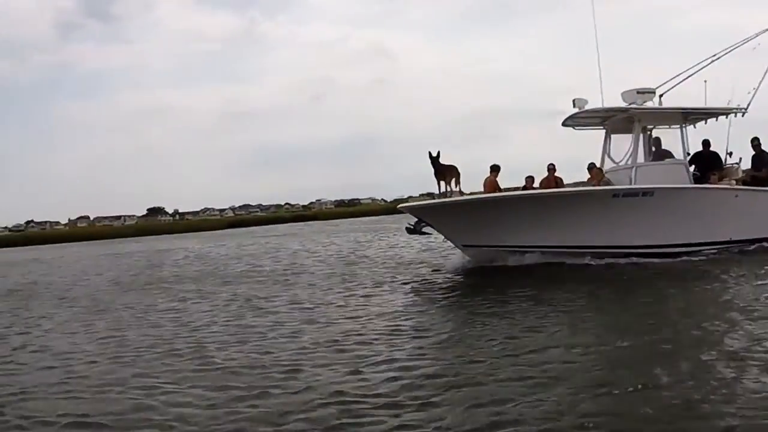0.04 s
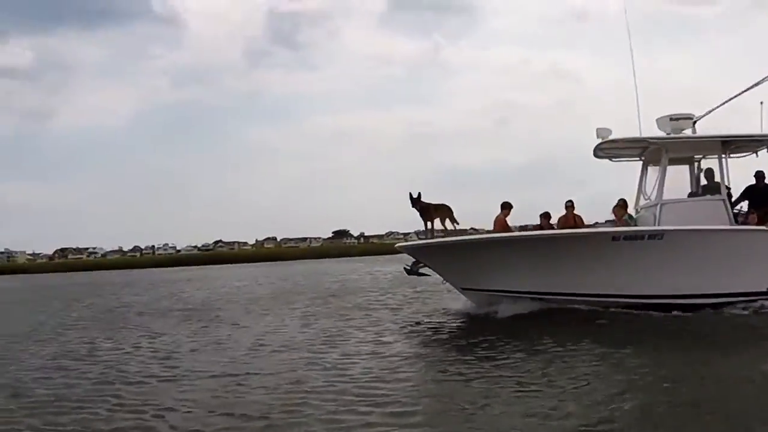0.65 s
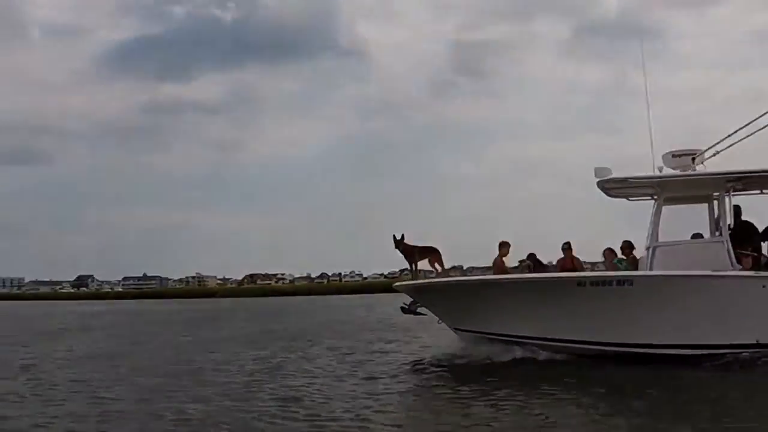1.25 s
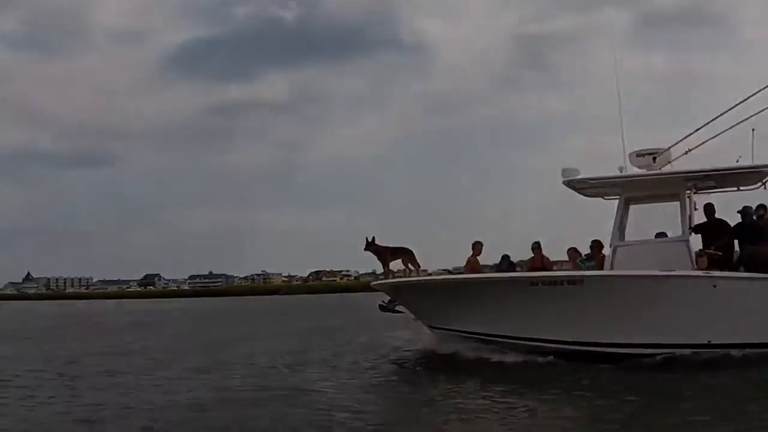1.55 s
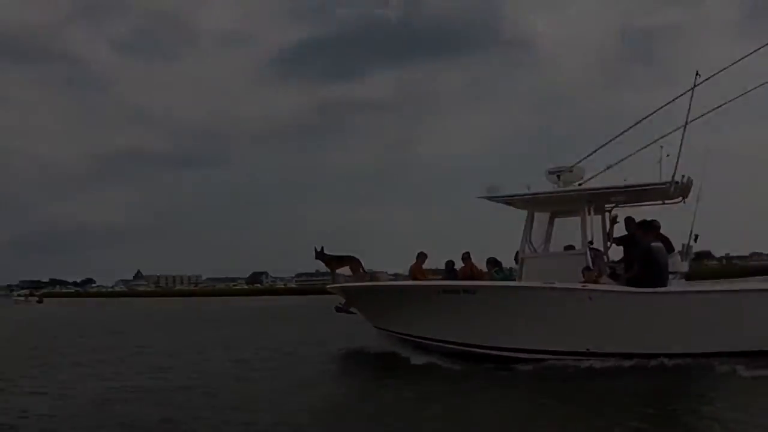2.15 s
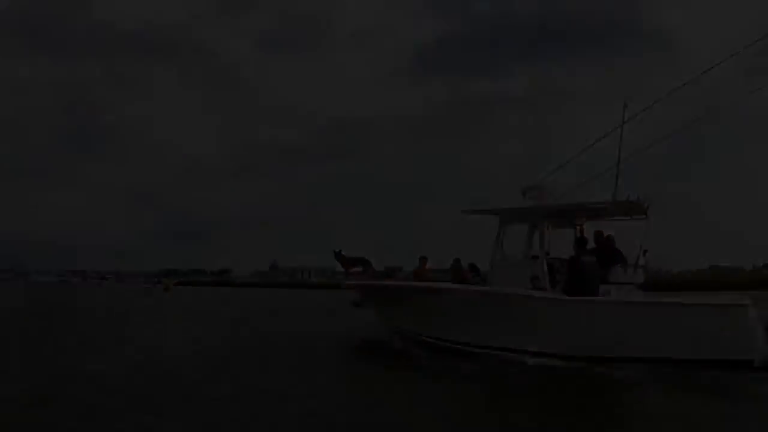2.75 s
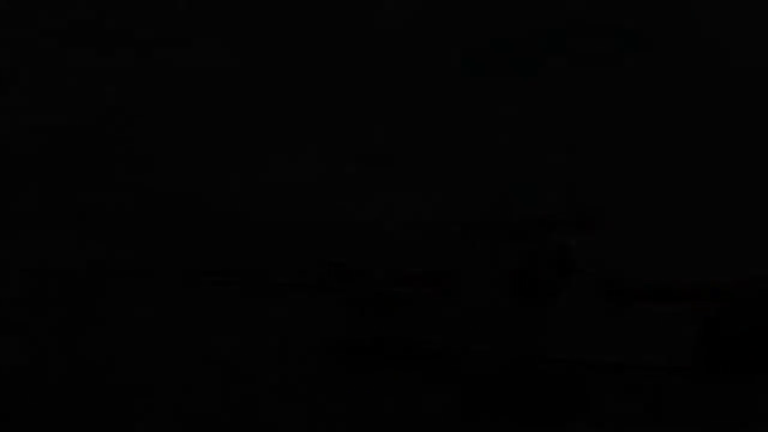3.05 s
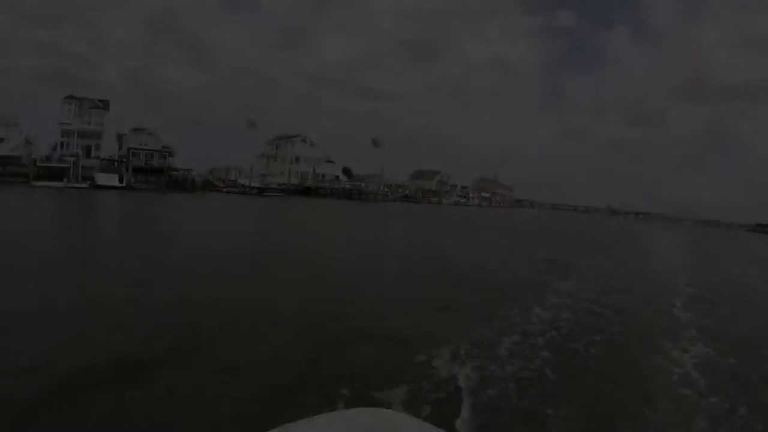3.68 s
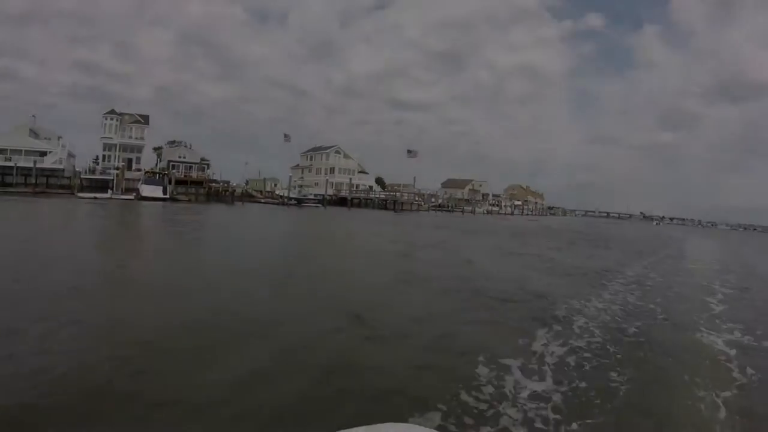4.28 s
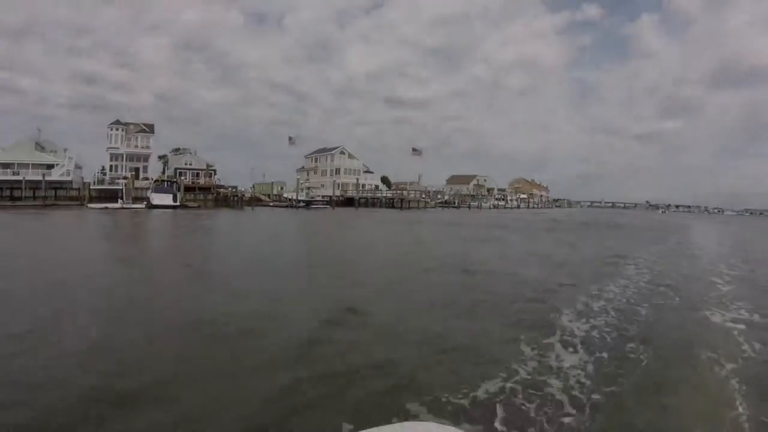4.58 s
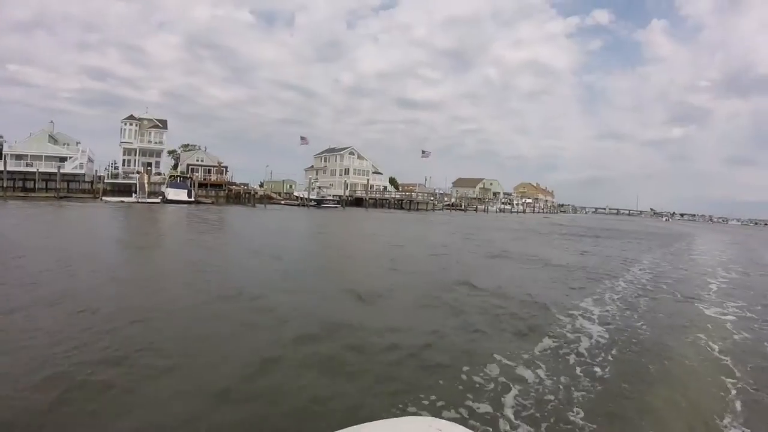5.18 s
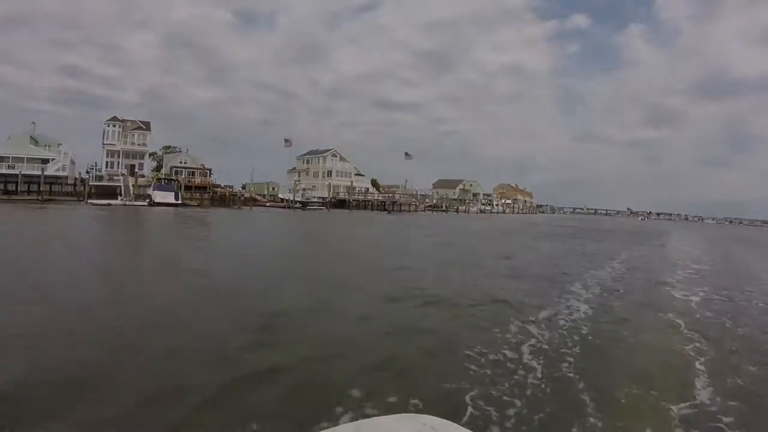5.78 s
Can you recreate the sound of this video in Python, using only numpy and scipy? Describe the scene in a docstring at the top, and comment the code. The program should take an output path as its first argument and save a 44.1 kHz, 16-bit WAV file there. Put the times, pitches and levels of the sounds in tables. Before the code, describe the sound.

A motorboat's outboard hums at cruise under gusty wind and wake hiss, then abruptly switches to a slow, knocking run with one sharp click.

```python
"""On board a motorboat with a four-stroke outboard: wind buffets the microphone, the wake hisses behind.
The engine first cruises, a firing hum over a mechanical roar. After a sudden change of scene it runs
slowly and keeps easing off: uneven knocks ring its cowl, and the shaft rasps and ticks on every turn.
Something flicks the microphone once."""
import sys
import numpy as np
from scipy import signal
from scipy.fft import rfft, irfft, next_fast_len
from scipy.io import wavfile
from scipy.ndimage import uniform_filter1d

SR = 44100
rng = np.random.default_rng(int(sys.argv[2]) if len(sys.argv) > 2 else 0)


def wav_out(sig):
    """Save sig, one row per channel (or a flat mono array), as 16-bit PCM at SR to the path in sys.argv[1]."""
    wavfile.write(sys.argv[1], SR, np.round(np.clip(np.atleast_2d(sig).T, -1, 1) * 32767).astype(np.int16))


N = 265746
TIME = np.arange(N) / SR
CHANGE_S, FLICK_S = 3.155, 3.8228
CRUISE_HZ, SLOW_HZ = 43.5, 26.45  # engine cycle rates; one cycle = two shaft turns
LOST_HZ = 0.48 * np.maximum(TIME - CHANGE_S, 0) ** 1.65  # the slow run eases off ever faster
SPEED_HZ = SLOW_HZ - LOST_HZ


def gain_of(db):
    """Decibels to gain."""
    return np.exp(np.asarray(db) * np.log(10) / 20)


def unit_rms(x):
    """Scales to rms 1."""
    return x / np.sqrt(np.mean(x ** 2) + 1e-20)


def swell(x, centre, half_width):
    """Gaussian bump, peak 1."""
    return np.exp(-((x - centre) / half_width) ** 2)


def noise(spectrum):
    """Noise of rms 1 with the given spectral shape, rolled off above its last point."""
    size = next_fast_len(N, True)
    hz = np.fft.rfftfreq(size, 1 / SR)
    freq_hz, level_db = np.transpose(spectrum)
    shape = gain_of(np.interp(np.log(hz + 1), np.log(freq_hz + 1), level_db))
    shape /= np.maximum(hz / freq_hz[-1], 1) ** 2
    return unit_rms(irfft(shape * np.exp(2j * np.pi * rng.random(len(hz))), size)[:N])


def drift(rate_hz, size=2048):
    """Slow random wander, rms 1."""
    hz = np.fft.rfftfreq(size, TIME[-1] / size)
    slow = irfft(rfft(rng.standard_normal(size)) * swell(hz, 0, rate_hz) * (hz > 0))
    return np.interp(TIME, np.linspace(0, TIME[-1], size), unit_rms(slow))


def steadied(x, span_s):
    """Divides out the running rms."""
    count = int(span_s * SR / 2)
    power = uniform_filter1d(uniform_filter1d(x ** 2, count), count)
    return x / np.sqrt(abs(power) + 1e-6)


def ring(x, modes):
    """Drives damped modes with x; output rms 1."""
    t = np.arange(2048) / SR
    response = np.zeros_like(t)
    for k, (freq_hz, width_hz, level_db) in enumerate(modes):
        envelope = gain_of(level_db) * np.sqrt(width_hz) * np.exp(-np.pi * width_hz * t)
        response += (-1) ** k * envelope * np.sin(2 * np.pi * freq_hz * t)
    return unit_rms(signal.oaconvolve(x, response)[:N])


def tone(cycles, order, waver_db):
    """Wavering sine at a whole multiple (order) of the cycle rate, rms 1."""
    phase = 2 * np.pi * (round(order) * cycles + rng.random())
    return unit_rms(gain_of(waver_db * drift(4.6)) * np.sin(phase))


def strikes(cycles, phase):
    """One impulse per cycle at the given phase."""
    count = np.floor(cycles - phase)
    return np.diff(count, prepend=count[0])


def bursts(cycles, phase, decay):
    """One noise burst per period; phase and decay in periods."""
    return np.exp(-((cycles - phase) % 1) / decay) * rng.standard_normal(N)


# Microphone hiss spectrum: freq_hz, relative_db
HISS_SPECTRUM = [(100, 16), (400, 15), (1200, 0), (3000, -2.5), (7000, 3), (10000, 0.5), (15500, 1.5)]

def microphone_hiss(level_db=-61):
    """Independent self-noise in each channel."""
    return gain_of(level_db) * np.array([noise(HISS_SPECTRUM), noise(HISS_SPECTRUM)])


# Churned water spectrum: freq_hz, relative_db
WAKE_SPECTRUM = [(150, 0.5), (330, 5), (500, 4), (750, 2.5), (1300, 1.5), (1800, -1.5), (2300, -10.5),
                 (3000, -2), (3800, -6), (4400, -10.5), (5000, -11.5), (5500, -12), (5950, -12.5),
                 (6500, -15.5), (9500, -24.5)]

def wake(cruising, fizz_db=1.2, width=0.023):
    """Churned water flickers as foam breaks; it thins with time, then with lost speed."""
    middle, side = noise(WAKE_SPECTRUM), width * noise(WAKE_SPECTRUM)
    cruise_db, slow_db = -55 - 0.7 * TIME, -54 - LOST_HZ
    level_db = cruising * cruise_db + (1 - cruising) * slow_db
    return gain_of(level_db + fizz_db * drift(28)) * np.array([middle + side, middle - side])


# Gusts: centre_s, half_width_s, buffet_db, flutter_db
GUSTS = [(.2, 0.05, -25.5, -57), (0.658, 0.14, -24, -49), (0.948, .06, -23.5, -42.5),
         (1.25, .13, -22, -31.5), (1.473, 0.044, -26, -34.5), (1.627, .06, -23.5, -60),
         (2.29, 0.095, -28, -55), (3.4, 0.082, -23, -53), (3.923, 0.067, -24, -49),
         (4.41, 0.067, -51, -40.5), (4.85, 0.14, -26, -48.5)]

def wind_gains(cruising, lull_db=1.5, db_per_lost_hz=-1.44):
    """Buffet and flutter gains: an uneven breeze that drops with speed, plus gusts."""
    breeze_db = db_per_lost_hz * LOST_HZ + lull_db * drift(8.7)
    buffet = gain_of(breeze_db - 33 * cruising - 32 * (1 - cruising))
    flutter = gain_of(breeze_db - 45.5)
    for centre_s, half_width_s, buffet_db, flutter_db in GUSTS:
        gust = swell(TIME, centre_s, half_width_s)
        buffet = np.hypot(buffet, gain_of(buffet_db) * gust)
        flutter = np.hypot(flutter, gain_of(flutter_db) * gust)
    return buffet, flutter


# Wind spectra (deep buffeting at each speed, quicker flutter): freq_hz, relative_db
FAST_BUFFET_SPECTRUM = [(2, -31), (6, -2.5), (13, 0.5), (22, -4.5), (40, -13.5), (70, -25), (150, -48)]
SLOW_BUFFET_SPECTRUM = [(2, -16), (7, 1.5), (12, -0.5), (20, -16.5), (40, -27.5), (70, -51), (150, -62)]
FLUTTER_SPECTRUM = [(20, -31), (38, -1.5), (55, 0.5), (78, -8.5), (125, -10.5), (200, -18), (350, -27.5),
                    (900, -51), (3000, -78)]

def wind(cruising, narrow_db=-16.5):
    """Eddies press on the microphone, larger and slower when the boat is slow."""
    buffet_gain, flutter_gain = wind_gains(cruising)
    eddies = cruising * noise(FAST_BUFFET_SPECTRUM) + (1 - cruising) * noise(SLOW_BUFFET_SPECTRUM)
    middle = buffet_gain * steadied(eddies, 0.3) + flutter_gain * steadied(noise(FLUTTER_SPECTRUM), 0.17)
    side = gain_of(-47.5) * noise(FAST_BUFFET_SPECTRUM) + gain_of(-62.5) * noise(FLUTTER_SPECTRUM)
    side *= gain_of(narrow_db * np.clip((TIME - FLICK_S) / 0.05, 0, 1))  # narrows after the flick
    return np.array([middle + side, middle - side])


def flick(rise_s=0.0001, snap_s=0.00006, push_s=0.0059, rebound_s=0.012, lag_s=0.00015):
    """A tap on the microphone: snap, pressure push and slow rebound, left port first."""
    t = TIME - FLICK_S - np.array([[0], [lag_s]])
    after = np.maximum(t, 0)
    snap = 0.61 * np.exp(-abs(t) / snap_s)
    push = np.exp(np.minimum(t, 0) / rise_s) * (1 - after / push_s) * np.exp(-after / push_s)
    rebound = 0.2 * (after / rebound_s) ** 2 * np.exp(2 - 2 * after / rebound_s)
    return gain_of([[-17.5], [-11.5]]) * (snap + push - rebound)


# Mechanical roar spectrum: freq_hz, relative_db
ROAR_SPECTRUM = [(120, -11), (250, 2), (380, -8.5), (520, -4.5), (680, -14.5), (900, -8.5), (1350, -1.5),
                 (1600, -8.5), (1880, -6), (2350, -17), (2900, -10), (3700, -27.5), (6500, -42),
                 (9500, -40)]
# Thin metallic resonances: freq_hz, width_hz, relative_db
METAL_MODES = [(4330, 590, 5), (5540, 230, -1), (6410, 360, -1.5), (8000, 750, -8.5)]

def cruise_roar(cycles, throb=0.13, metal_db=-16, treble_hz=2500, treble_db_per_s=-0.96):
    """Mechanical noise throbs with cycle and shaft, creeping up as its treble dulls."""
    beat = 1 + throb * (np.sin(2 * np.pi * cycles) + np.sin(4 * np.pi * cycles))
    roar = noise(ROAR_SPECTRUM) + gain_of(metal_db) * ring(rng.standard_normal(N), METAL_MODES)
    treble = signal.sosfiltfilt(signal.butter(4, treble_hz, "high", fs=SR, output="sos"), roar)
    roar += (gain_of(treble_db_per_s * (TIME - CHANGE_S / 2)) - 1) * treble
    return gain_of(-46.5 + 0.37 * TIME) * beat * roar


# Engine tones at cruise: order, level_db
CRUISE_TONES = [(4, -49), (5, -56), (7, -51.5), (8, -59.5), (10, -54.5), (11, -66.5), (12, -59), (13, -64),
                (22, -60.5), (23, -68.5), (24, -57), (27, -70), (28, -61.5), (30, -65), (31, -66),
                (32, -53.5), (33, -59.5), (34, -64.5), (42, -63)]

def cruising_engine(fade_s=0.5, fade_db=-3, whine_order=30):
    """Six-cylinder firing hum, fading shaft hum and one swelling whine, over the roar."""
    cycles = np.cumsum(CRUISE_HZ * (1 + 0.00096 * drift(9))) / SR
    fade = np.clip(1 + (TIME - CHANGE_S) / fade_s, 0, 1)
    firing = gain_of(-38 - 0.52 * TIME + fade_db * fade) * tone(cycles, order=6, waver_db=0.34)
    shaft = gain_of(-42 - 4 * TIME) * tone(cycles, order=2, waver_db=1.24)
    whine_gain = gain_of(-52.5) * swell(TIME, 2.52, 0.6)
    tones = np.zeros(N)
    for order, level_db in CRUISE_TONES:
        gain = gain_of(level_db) + whine_gain * (round(order) == whine_order)
        tones += gain * tone(cycles, order, waver_db=1.5)
    return firing + shaft + tones + cruise_roar(cycles)


# Rasp resonances: freq_hz, width_hz, relative_db
SHAFT_RASP_MODES = [(2770, 220, -4), (2900, 100, -5.5), (3270, 120, 1.5), (4250, 180, -5), (4550, 75, -5),
                    (5320, 480, -9.5), (6800, 570, -7.5), (7940, 710, -11), (13400, 450, -18)]

def shaft_rasp(turns, shake, threshold_hz=25.24, fade_hz=0.07):
    """One rasp per turn: builds up, then goes faint below a threshold speed."""
    loud_db = -58.5 - 3 * swell(TIME, CHANGE_S, 0.4) + 3.5 * shake
    faint_db = -70.5
    rasping = np.clip((SPEED_HZ - threshold_hz) / fade_hz + 0.5, 0, 1)
    scrapes = bursts(turns, phase=0.58, decay=0.32) * gain_of(0.99 * drift(26))
    return gain_of(rasping * loud_db + (1 - rasping) * faint_db) * ring(scrapes, SHAFT_RASP_MODES)


# Tick resonances: freq_hz, width_hz, relative_db
SHAFT_TICK_MODES = [(6350, 120, -1), (7220, 260, -4.5), (4500, 210, -6), (3380, 400, -3.5)]

def shaft_tick(turns, shake):
    """One bright tick per turn, louder as speed falls."""
    level_db = -73.5 + 1.5 * LOST_HZ + 4 * shake
    return gain_of(level_db) * ring(bursts(turns, phase=0.12, decay=0.076), SHAFT_TICK_MODES)


# Engine tones in the slow run: order, base_db
SLOW_TONES = [(4, -52.5), (5, -61.5), (6, -63.5), (7, -69.5), (8, -59.5), (9, -68), (10, -62), (12, -65),
              (38, -71), (41, -70.5), (48, -71), (52, -65), (56, -66)]

def slow_tones(cycles, cowl_hz=1290, half_width_hz=60, lift_db=5.6):
    """Low orders die down with the throttle; high ones lift while crossing the cowl's main resonance."""
    load = (SPEED_HZ / SLOW_HZ) ** 7
    tones = np.zeros(N)
    for order, base_db in SLOW_TONES:
        resonance = swell(order * SPEED_HZ, cowl_hz, half_width_hz)
        gain = load if order < 20 else gain_of(lift_db * resonance)
        tones += gain_of(base_db) * gain * tone(cycles, order, waver_db=2.5)
    return tones


# Resonances of the heavy blow: freq_hz, width_hz, relative_db
HEAVY_BLOW_MODES = [(1025, 47, -4), (1215, 33, 2), (1288, 55, -1.5)]
# Tones that sing with it: order, relative_db
HEAVY_BLOW_TONES = [(45, -7.5), (46, -5.5)]

def heavy_blow(cycles, force, phase=0.42, rattle=0.42, first_db=-54, settled_db=-61.5, settle_s=1):
    """One blow per cycle rings lower and longer, softening as the throttle eases."""
    level_db = settled_db + (first_db - settled_db) * swell(TIME, CHANGE_S, settle_s)
    blows = unit_rms(force * strikes(cycles, phase))
    chatter = unit_rms(bursts(cycles, phase, decay=0.085))
    thud = ring(blows + rattle * chatter, HEAVY_BLOW_MODES)
    singing = sum(gain_of(db) * tone(cycles, order, waver_db=1.5) for order, db in HEAVY_BLOW_TONES)
    return gain_of(level_db) * (thud + singing)


# Blows in each slow cycle: phase_cycles, relative_db
BLOWS = [(0.049, -4.5), (.24, 0), (.44, 0), (0.601, -4), (.77, 0), (.9, 2)]
# Cowl resonances: freq_hz, width_hz, relative_db
COWL_MODES = [(1027, 66, -10), (1326, 91, -0.5), (1530, 140, -6), (1810, 170, -9), (2780, 320, -9.5),
              (3230, 760, -13.5)]

def cowl_clatter(cycles, force, shake, rattle=1.3):
    """Six uneven blows per cycle ring the cowl; loose parts rattle after each."""
    blows = force * sum(gain_of(db) * strikes(cycles, phase) for phase, db in BLOWS)
    chatter = sum(gain_of(db) * bursts(cycles, phase, decay=0.17) for phase, db in BLOWS)
    level_db = -53 - LOST_HZ + 1.5 * shake
    return gain_of(level_db) * ring(unit_rms(blows) + rattle * unit_rms(chatter), COWL_MODES)


def slow_engine(first_cycle_s=3.15, uneven_db=1.0, shake_hz=25.55, shake_half_width_hz=0.4):
    """The engine slows through a shaft resonance that lifts clatter, rasp and tick."""
    cycles = np.cumsum(SPEED_HZ * (1 + 0.0006 * drift(11))) / SR
    cycles -= np.interp(first_cycle_s, TIME, cycles)
    shake = swell(SPEED_HZ, shake_hz, shake_half_width_hz)
    force = gain_of(uneven_db * rng.standard_normal(N))
    knocking = cowl_clatter(cycles, force, shake) + heavy_blow(cycles, force)
    shaft = shaft_rasp(2 * cycles, shake) + shaft_tick(2 * cycles, shake)
    return knocking + shaft + slow_tones(cycles)


def scene():
    """Engine in the middle, water and wind around it."""
    cruising = np.clip((CHANGE_S - TIME) / 0.014 + 0.5, 0, 1)  # 1 to 0 in a 14 ms crossfade
    engine = cruising * cruising_engine() + (1 - cruising) * slow_engine()
    return wake(cruising) + wind(cruising) + flick() + engine


def record(dry):
    """Adds microphone hiss, then low-passes at 15.75 kHz."""
    low_pass = signal.firwin(511, 15750, window=("kaiser", 9), fs=SR)
    return signal.oaconvolve(dry + microphone_hiss(), low_pass[None], "same")


dry = scene()
out = record(dry)
wav_out(out)
```